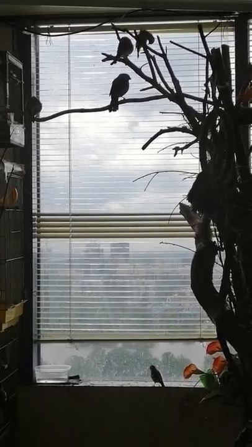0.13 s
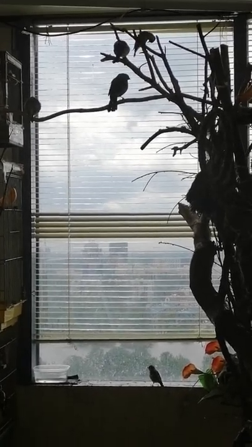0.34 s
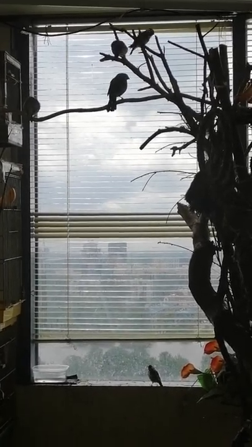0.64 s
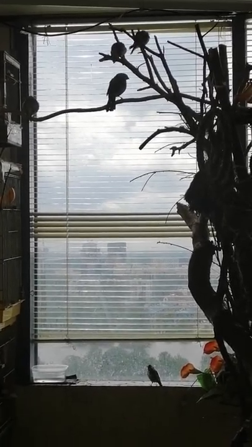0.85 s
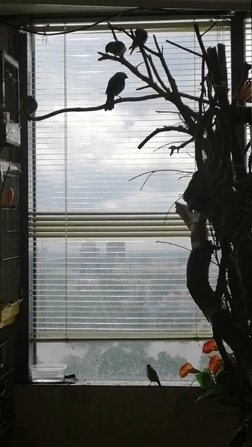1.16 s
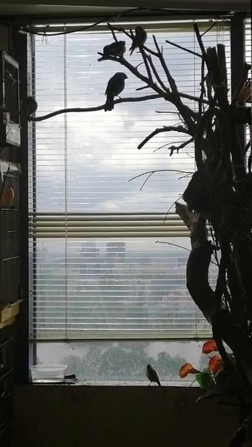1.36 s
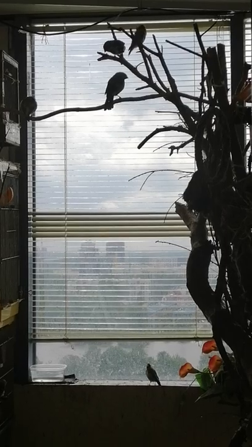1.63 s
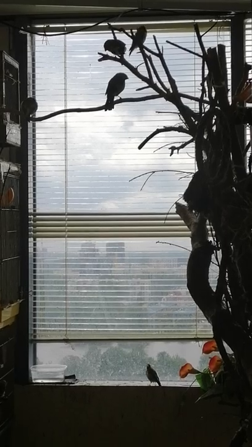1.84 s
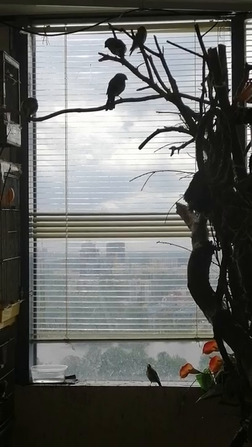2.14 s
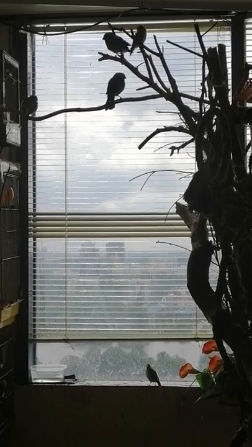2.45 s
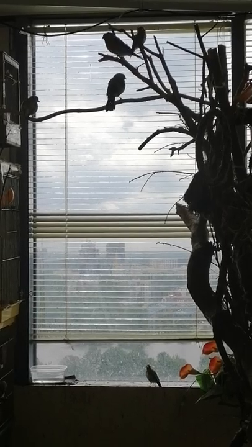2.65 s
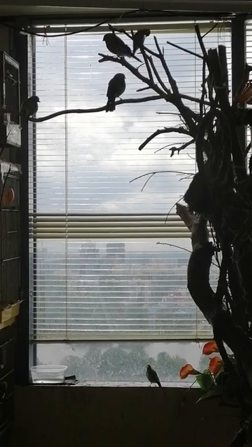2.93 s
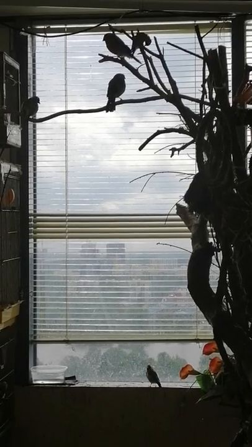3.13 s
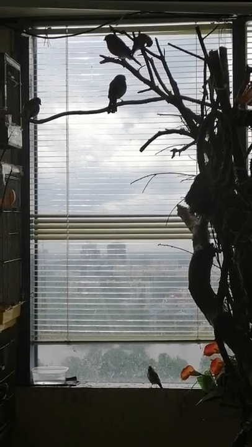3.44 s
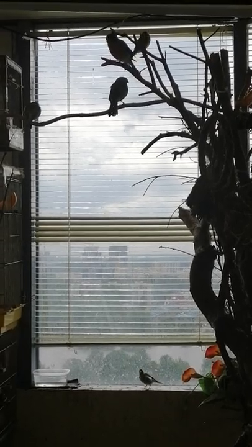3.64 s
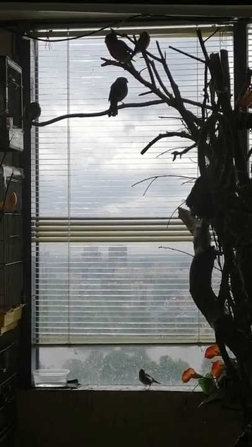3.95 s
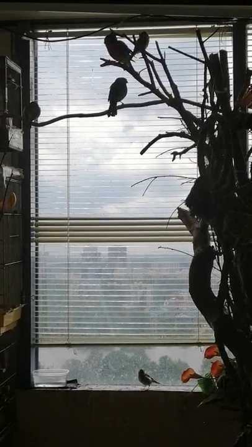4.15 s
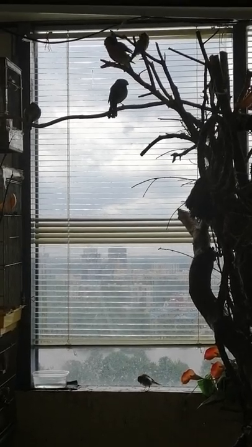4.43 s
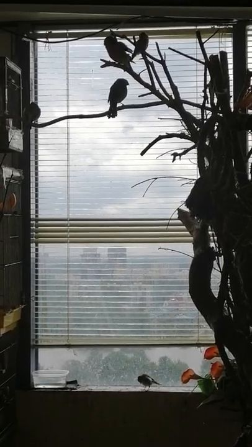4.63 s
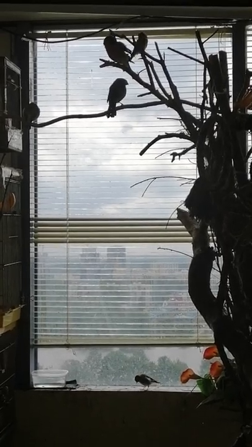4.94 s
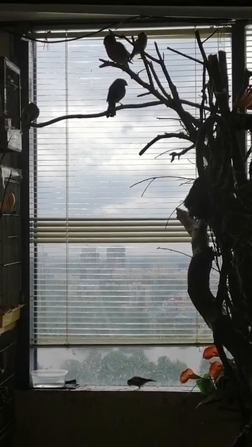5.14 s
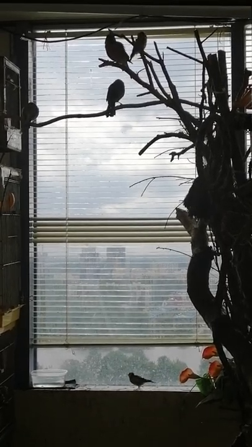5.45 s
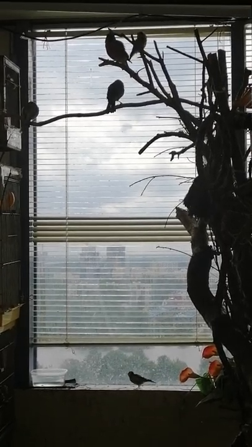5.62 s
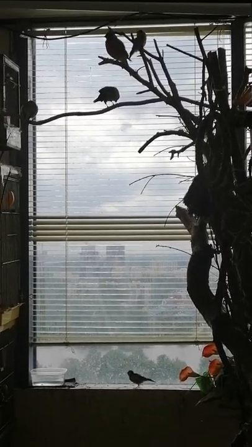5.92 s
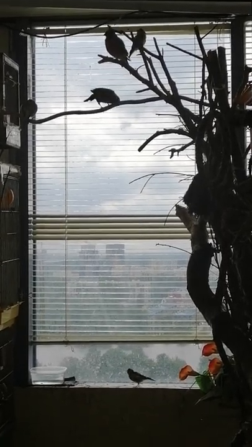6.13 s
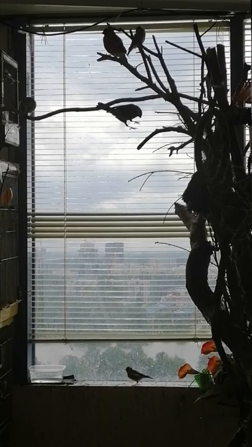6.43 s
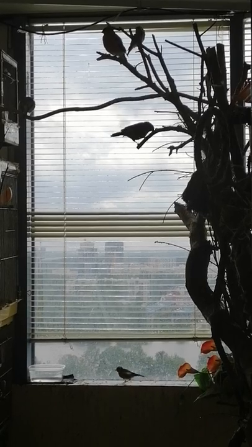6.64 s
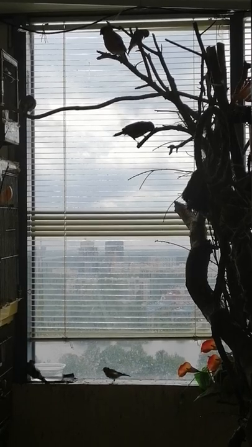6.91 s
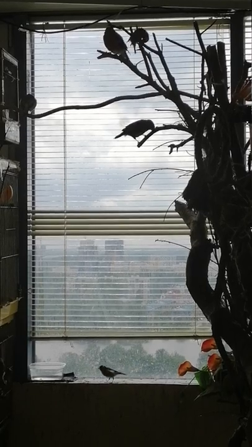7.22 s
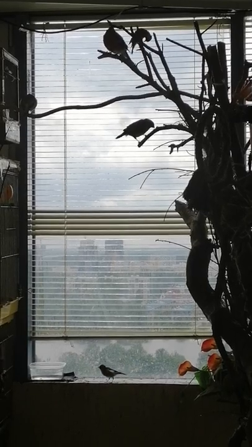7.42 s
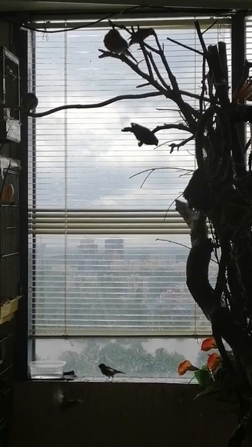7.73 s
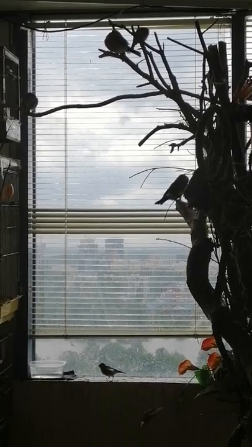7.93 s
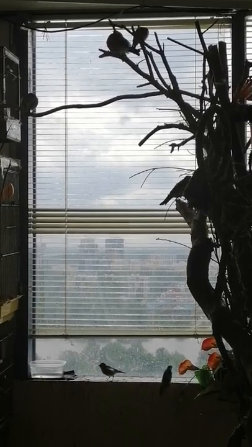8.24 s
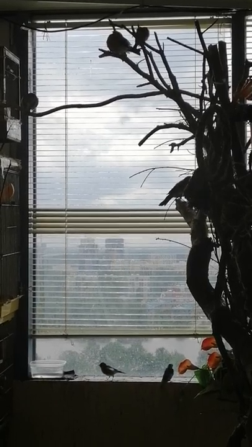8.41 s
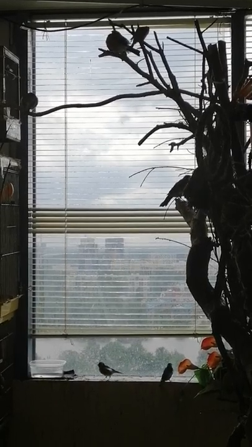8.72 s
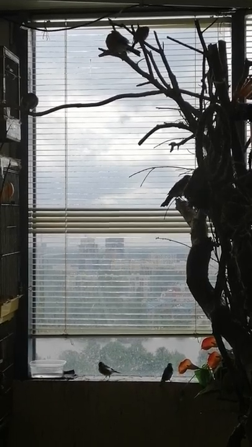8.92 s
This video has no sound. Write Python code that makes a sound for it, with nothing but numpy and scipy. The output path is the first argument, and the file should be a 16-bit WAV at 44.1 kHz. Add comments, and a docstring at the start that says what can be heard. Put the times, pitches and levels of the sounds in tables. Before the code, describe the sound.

Indoor bird twitter over a low, swelling city murmur. Harsh chattering calls come first, then a sparse stretch of faint chirps, clicks and a momentary total silence. Soft squawks thicken around the middle, with clear whistles that break downward, then three short chacks. Piercing high sweeps, a slow upslur and bright nasal calls end it. The microphone hears birds at some distance, with lively room echo and a duller right side.

```python
"""A bare, ringing room with a window: a city murmurs behind it, shaped noise whose level swells.
Several small songbirds sing: gliding sines make low whistles, upslurs, drops, high arches and chirps;
pulse trains through throat resonances make nasal calls, squawks and, with hiss, harsh chatter.
Noise snaps make ticks of bills and claws; decaying modes make one knock on a perch.
The sound cuts out once, for about a tenth of a second."""
import sys
import numpy as np
from scipy import signal
from scipy.fft import rfft, irfft, next_fast_len
from scipy.io import wavfile
from scipy.ndimage import map_coordinates

SR = 44100
rng = np.random.default_rng(int(sys.argv[2]) if len(sys.argv) > 2 else 0)


def materialize(psi):
    """Save the field psi as 16-bit PCM at rate SR to the path in sys.argv[1].

    A 1-D psi becomes a single channel; in a 2-D psi each row is a channel.
    """
    bounded = np.clip(np.atleast_2d(psi).T, -1, 1)
    quanta = np.round(bounded * 32767).astype(np.int16)
    wavfile.write(sys.argv[1], SR, quanta)


N = 399987
TOP_HZ = 15750  # band limit


def amp(db):
    """Decibels to amplitude."""
    return 10 ** (np.asarray(db) / 20)


def unit(x):
    """Each channel at rms 1."""
    return x / np.sqrt(np.mean(x ** 2, axis=-1, keepdims=True) + 1e-20)


def along(points, hz):
    """(Hz, value) points interpolated on a log frequency axis."""
    f, v = np.transpose(points)
    return np.interp(np.log(hz + 1), np.log(f + 1), v)


def wobble(rate_hz, size):
    """A smooth random curve, rate_hz knots a second."""
    knots = rng.standard_normal(int(size * rate_hz / SR) + 4)
    return map_coordinates(knots, [np.arange(size) * rate_hz / SR], order=2)


def filtered(x, response):
    """x times a response of frequency."""
    n = x.shape[-1]
    m = next_fast_len(n + 2048)
    return irfft(rfft(x, m) * response(np.fft.rfftfreq(m, 1 / SR)), m)[..., :n]


def add(track, s, sound):
    """Mix a stereo sound in at time s."""
    start = max(round(s * SR), 0)
    part = track[:, start:start + sound.shape[1]]
    part += sound[:, :part.shape[1]]


def panned(db, left_db):
    """Gains of left and right, left_db apart."""
    return amp([[db + left_db / 2], [db - left_db / 2]])


def swell(u, peak, power):
    """A smooth rise and fall over u = 0..1, highest at peak."""
    quarter_turns = np.interp(u, [0, np.clip(peak, .05, .95), 1], [0, np.pi / 2, np.pi])
    return np.abs(np.sin(quarter_turns)) ** power


# room decay: f/Hz, t60/s
ROOM_DECAY = [(2000, 0.36), (5500, 0.35), (8000, 0.35), (14000, 0.29)]


def room(direct_db, early_db=3, early_s=0.061, build_s=0.0013):
    """One path to both channels: direct sound, echoes that pile up, a tail that dies by band."""
    hz, t, z = signal.stft(rng.standard_normal((2, SR // 2)), SR, nperseg=256)
    decay_db = -60 * t / along(ROOM_DECAY, hz)[:, None]
    early_boost_db = early_db * np.exp(-t / early_s)
    build_up = 1 - np.exp(-t / build_s)
    path = signal.istft(z * amp(decay_db + early_boost_db) * build_up, SR, nperseg=256)[1]
    path /= np.linalg.norm(path, axis=1, keepdims=True)
    path[:, 0] += amp(direct_db)
    return path


def heard(sound, direct_db):
    """A sound through a newly drawn room path, at rms 1 over its length plus 40 ms of echo."""
    wet = signal.fftconvolve(sound[None], room(direct_db), axes=1)
    body = wet[:, :len(sound) + SR // 25]
    return wet / np.sqrt(np.mean(body ** 2, axis=1, keepdims=True) + 1e-20)


# murmur spectrum: f/Hz, relative level/dB per Hz
MURMUR_COLOUR = [(25, -2.5), (62, -8), (82, -15.5), (170, -5.5), (420, -16), (1050, -13), (1600, -22.5),
                 (2500, -27), (3300, -26), (4100, -44), (4900, -26.5), (6200, -35), (11000, -39)]
# murmur left-right likeness: f/Hz, correlation/0-1
MURMUR_ALIKE = [(150, 0.84), (600, 0.51), (1500, .05)]
# murmur swells, before drift: t/s, level/dB
MURMUR_SWELLS = [(0, -58), (2, -53.5), (3.199, -55.5), (5.4, -57), (5.75, -52), (6.1, -57.5), (7.3, -56),
                 (9, -57.5)]


def murmur(drift_db=1.5):
    """Distant city: shaped noise, nearly the same in both channels in the bass."""
    def mid_side(f):
        turn = np.arccos(np.clip(along(MURMUR_ALIKE, f), -1, 1)) / 2
        return amp(along(MURMUR_COLOUR, f)) * np.array([np.cos(turn), np.sin(turn)])

    mid, side = filtered(rng.standard_normal((2, N)), mid_side)
    db = np.interp(np.arange(N) / SR, *np.transpose(MURMUR_SWELLS)) + drift_db * wobble(14, N)
    return unit(np.array([mid + side, mid - side])) * amp(db)


# bill and claw contacts: t/s, level/dB
TICK_TIMES = [(1.318, -53.5), (1.345, -52), (1.995, -56.5), (2.032, -55.5), (2.512, -51), (2.672, -54.5),
              (4.581, -54), (6.345, -49), (6.512, -48), (7.029, -46.5), (7.093, -54.5), (7.755, -42.5)]
# tick spectrum: f/Hz, relative level/dB
TICK_SPECTRUM = [(1200, -57), (3000, -1.5), (6000, -2), (7800, 13), (10000, 3), (15000, -35)]


def ticks(t60_s=0.048):
    """Tiny hard contacts: 20 ms noise snaps, mostly heard as the room's answer."""
    out = np.zeros((2, N))
    t = np.arange(SR // 50) / SR
    for s, db in TICK_TIMES:
        snap = rng.standard_normal(len(t)) * amp(-60 * t / t60_s)
        coloured = filtered(snap, lambda f: amp(along(TICK_SPECTRUM, f)))
        add(out, s, amp(db) * heard(coloured, direct_db=-6.5))
    return out


KNOCK_S, KNOCK_DB = 3.554, -50.5
# perch modes: f/Hz, relative level/dB, t60/s
PERCH_MODES = [(850, -4.5, 0.033), (1600, -11.5, 0.023), (3200, -11, .01), (3750, 1, .008),
               (4250, 4, 0.0098), (8400, -1, 0.0079)]


def knock():
    """A bird knocks once on its perch: decaying modes make a short woody tap."""
    out = np.zeros((2, N))
    t = np.arange(SR // 40) / SR
    ring = sum(amp(db - 60 * t / t60) * np.sin(2 * np.pi * hz * t) for hz, db, t60 in PERCH_MODES)
    add(out, KNOCK_S, amp(KNOCK_DB) * heard(ring, direct_db=-8))
    return out


def glide(length_s, pitches_hz, waver, rate_hz):
    """Progress 0..1 and phase of a note that bends through its pitches and wavers on the way."""
    u = np.linspace(0, 1, int(length_s * SR))
    bend = np.polyfit(np.linspace(0, 1, len(pitches_hz)), pitches_hz, len(pitches_hz) - 1)
    hz = np.polyval(bend, u) * np.exp(waver * wobble(rate_hz, len(u)))
    return u, 2 * np.pi * np.cumsum(hz) / SR


def whistle(length_s, pitches_hz, direct_db, waver=0.007, waver_rate_hz=67.0, second_db=-38):
    """A relaxed syrinx holds a near sine, which builds up and beats in the room."""
    u, phase = glide(length_s, pitches_hz, waver, waver_rate_hz)
    tone = np.sin(phase) + amp(second_db) * np.sin(2 * phase)
    return heard(tone * swell(u, peak=0.45, power=1.0), direct_db)


def chirp(length_s, pitches_hz, harsh, flutter=0.145, overtone=0.55, overtone_top_hz=9500):
    """A sweep the room smears into a band; a pressed syrinx flutters and gains an overtone."""
    u, phase = glide(length_s, pitches_hz, flutter * harsh, rate_hz=1100)
    second = overtone * harsh / (1 + (2 * np.mean(pitches_hz) / overtone_top_hz) ** 6)
    tone = np.sin(phase) + second * np.sin(2 * phase)
    return heard(tone * swell(u, peak=0.41, power=0.35), direct_db=-15.5)


def pulses(phase, pitch_hz):
    """The syrinx snaps shut once a cycle: all harmonics alike."""
    return unit(sum(np.cos(k * phase) for k in range(1, int(TOP_HZ / pitch_hz) + 1)))


# throat and open bill of a call: f/Hz, relative level/dB
THROAT_COLOUR = [(1100, -14.5), (2000, -0.5), (3100, 5), (4000, -7), (5200, 0.5), (7200, 0.5),
                 (10500, -11.5), (14500, -14)]


def voiced(source, bill_hz, focus_db_per_octave):
    """Throat resonances, one band favoured by the open bill, then the room."""
    def colour(f):
        octaves_off = np.abs(np.log2((f + 1) / bill_hz))
        return amp(along(THROAT_COLOUR, f) - focus_db_per_octave * octaves_off)

    return heard(filtered(source, colour), direct_db=-10)


def rasp(length_s, pitch_hz, rough, softness, hiss=.45, rattle_db=5, crescendo_db=6):
    """Uneven pulses with rushing air; the air pressure builds towards mid-call, and rattles."""
    u, phase = glide(length_s, [pitch_hz] * 3, rough, rate_hz=600)
    source = pulses(phase, pitch_hz) + hiss * rough * rng.standard_normal(len(u))
    crescendo = crescendo_db * swell(u, peak=0.53, power=1.5)
    rattle = rattle_db * wobble(219, len(u))
    return source * amp(crescendo + rattle) * swell(u, 0.19, softness)


# rising chirps: t/s, length/s, middle f/Hz, level/dB, harshness/0-1
RISING_CHIRPS = [(1.703, 0.033, 2726, -43.5, 0.76), (2.349, 0.028, 3230, -46, 0.48),
                 (2.47, 0.027, 4390, -47.5, 0.2), (3.237, 0.037, 4870, -46, 0.7),
                 (6.108, 0.0057, 1900, -48, 0.2), (6.251, 0.0097, 1946, -44.5, 0.03),
                 (7.424, 0.043, 4800, -46, 0.87)]
# chirps that fall fast, then slowly: t/s, length/s, start f/Hz, fall/Hz, level/dB, harshness/0-1
FALLING_CHIRPS = [(0.244, 0.023, 7360, 853, -44, 0.6), (0.41, 0.057, 8180, 1410, -35, 0.3),
                  (1.101, 0.029, 2793, 713, -37, 0.29), (1.376, 0.075, 3115, 496, -47, 0.65),
                  (1.452, .031, 4730, 493, -42, 0.5), (2.112, 0.059, 7770, 780, -49.5, 0.4),
                  (5.132, .05, 3626, 790, -33.5, .33), (5.89, 0.035, 4280, 340, -45, 0.75),
                  (7.1, 0.025, 2497, 840, -34, 0), (7.499, 0.07, 3533, 780, -48, 0.72),
                  (8.644, .037, 6630, 1053, -45.5, 1), (8.799, 0.039, 3720, 1903, -34, 0.76)]
# buzzy notes creeping upwards: t/s, length/s, middle f/Hz, level/dB, harshness/0-1
BUZZY_NOTES = [(.456, 0.044, 3360, -36.5, .42), (3.035, .11, 2900, -58, .8), (3.035, .11, 6020, -52, .34),
               (5.052, 0.045, 5500, -43, 0.1), (5.216, .09, 3040, -34.5, 0.27),
               (5.687, 0.052, 5390, -39.5, .22), (5.924, .075, 3472, -35.5, 0.37),
               (5.92, .04, 2090, -48.5, 0.54), (8.734, 0.078, 2320, -45.5, 0.69)]
# short plain whistles: t/s, length/s, start f/Hz, end f/Hz, level/dB
PLAIN_PIPES = [(1.091, 0.012, 4800, 4930, -42), (2.083, 0.074, 4900, 4580, -57.5),
               (2.663, 0.093, 3870, 3480, -47), (2.773, 0.11, 4980, 4710, -57),
               (3.001, 0.059, 2170, 1900, -61), (3.248, 0.054, 5740, 6040, -42.5),
               (5.7, 0.087, 846, 924, -58.5), (5.69, 0.15, 1675, 1890, -61), (5.79, 0.094, 4900, 4750, -58),
               (7.058, 0.17, 4850, 4730, -57.5), (7.3, 0.21, 1160, 1205, -56),
               (8.026, .065, 5130, 5280, -42), (8.781, 0.026, 5210, 5360, -38)]
RISE_OCTAVES, CREEP_OCTAVES = 0.485, .12
EARLY_FALL = .62  # share of the fall done halfway through


def chirps():
    """Twitter between the louder calls: gliding sines, rising, falling, buzzy and plain."""
    out = np.zeros((2, N))
    for notes, octaves in (RISING_CHIRPS, RISE_OCTAVES), (BUZZY_NOTES, CREEP_OCTAVES):
        for s, length, hz, db, harsh in notes:
            ends_hz = hz * 2 ** (octaves * np.array([-.5, .5]))
            add(out, s, amp(db) * chirp(length, ends_hz, harsh))
    for s, length, hz, fall_hz, db, harsh in FALLING_CHIRPS:
        add(out, s, amp(db) * chirp(length, [hz, hz - EARLY_FALL * fall_hz, hz - fall_hz], harsh))
    for s, length, start_hz, end_hz, db in PLAIN_PIPES:
        note = whistle(length, [start_hz, end_hz], direct_db=-6.5, waver=0.017, waver_rate_hz=303)
        add(out, s, amp(db) * note)
    return out


# nasal calls: t/s, length/s, pitch f/Hz, waver/0-1, bill resonance f/Hz, level/dB
NASAL_CALLS = [(0, 0.012, 1846, 0.02, 4750, -40), (1.091, 0.015, 982, 0.02, 3940, -43.5),
               (5.673, 0.095, 876, 0.06, 5700, -52.5), (5.908, 0.032, 1705, 0.05, 6800, -38),
               (7.91, 0.1, 1725, .07, 5970, -41), (8.99, 0.064, 1060, 0.05, 6700, -34),
               (8.998, .075, 1702, 0.06, 5830, -31.5)]


def nasals():
    """Even pulses give a clear stack of harmonics."""
    out = np.zeros((2, N))
    for s, length, hz, waver, bill_hz, db in NASAL_CALLS:
        u, phase = glide(length, [hz, hz], waver, rate_hz=310)
        source = pulses(phase, hz) * swell(u, 0.17, 0.1)
        add(out, s, amp(db) * voiced(source, bill_hz, focus_db_per_octave=10.5))
    return out


# softer, higher squawks: t/s, length/s, bill resonance f/Hz, level/dB
SQUAWK_CALLS = [(1.43, 0.068, 2620, -40.5), (1.492, 0.11, 2740, -42.5), (1.722, 0.022, 3750, -42),
                (3.948, .06, 2900, -47), (4.038, 0.041, 4420, -38.5), (4.425, 0.09, 5320, -41),
                (4.614, 0.086, 4960, -49), (4.821, 0.046, 4350, -54), (4.955, 0.094, 4920, -40.5),
                (5.14, 0.16, 5430, -49), (5.438, 0.051, 4900, -37.5), (7.236, 0.11, 3000, -53.5),
                (7.581, 0.084, 4560, -38), (7.782, 0.086, 3100, -38.5), (7.89, .07, 3950, -44),
                (8.478, 0.088, 4220, -41)]
SQUAWK_HZ, SQUAWK_ROUGH = 967, .15


def squawks():
    """Rasps that swell in softly, each with its own opening of the bill."""
    out = np.zeros((2, N))
    for s, length, bill_hz, db in SQUAWK_CALLS:
        source = rasp(length, SQUAWK_HZ, SQUAWK_ROUGH, softness=0.2)
        add(out, s, amp(db) * voiced(source, bill_hz, focus_db_per_octave=12.0))
    return out


# thin high arches: t/s, top f/Hz, slide/s, level/dB
ARCH_NOTES = [(4.297, 8100, 0.033, -43), (7.522, 8160, 0.032, -31), (8.162, 8590, .048, -30.5)]
ARCH_FOOT_HZ, ARCH_UP_S, ARCH_END_HZ = 5050, 0.015, 6700
TAIL_GAP_S, TAIL_S, TAIL_HZ, TAIL_DB = 0.032, .02, [5240, 3610], -12  # TAIL_DB re arch


def arches(harsh=0.083):
    """Sweeps shoot up, slide down and, after a tiny gap, end in a faint lower tail."""
    out = np.zeros((2, N))
    for s, top_hz, slide, db in ARCH_NOTES:
        add(out, s, amp(db) * chirp(ARCH_UP_S, [ARCH_FOOT_HZ, top_hz], harsh))
        add(out, s + ARCH_UP_S, amp(db) * chirp(slide, [top_hz, ARCH_END_HZ], harsh))
        tail_s = s + ARCH_UP_S + slide + TAIL_GAP_S
        add(out, tail_s, amp(db + TAIL_DB) * chirp(TAIL_S, TAIL_HZ, harsh))
    return out


# slow rise, then flick: t/s, level/dB, flick level/dB, harshness/0-1
UPSLUR_NOTES = [(.745, -33.5, -35, 0.12), (8.471, -32, -27, 0.07)]
RISE_S, RISE_HZ, FLICK_S, FLICK_HZ = .087, [1837, 2106, 2260], 0.032, [2286, 2760, 3500]


def upslurs():
    """A slow rising sweep runs straight into a quick flick upwards."""
    out = np.zeros((2, N))
    for s, db, flick_db, harsh in UPSLUR_NOTES:
        add(out, s, amp(db) * chirp(RISE_S, RISE_HZ, harsh))
        add(out, s + RISE_S, amp(flick_db) * chirp(FLICK_S, FLICK_HZ, harsh))
    return out


# held note, then low: t/s, hold/s, f/Hz, level/dB, held left over right/dB, low level/dB
DROP_NOTES = [(4.593, 0.11, 2710, -34, 15, -36.5), (5.189, 0.081, 2533, -27, -4.5, -40.5)]
DROP_S, SINK_S = .02, 0.0774
DROP_TO, SINK_TO = .76, .68  # shares of the held pitch
DROP_DB = -0.5  # the break, re the low note


def drops(low_left_db=-3.5):
    """A loud held whistle breaks downwards; the lower note sinks away."""
    out = np.zeros((2, N))
    for s, hold, hz, db, left_db, low_db in DROP_NOTES:
        held = whistle(hold, [hz, hz], direct_db=-11)
        add(out, s, panned(db, left_db) * held)
        drop = chirp(DROP_S, [hz, hz * DROP_TO], harsh=.03)
        add(out, s + hold - DROP_S / 2, amp(low_db + DROP_DB) * drop)
        sinking = whistle(SINK_S, [hz * DROP_TO, hz * SINK_TO], direct_db=-2.5)
        add(out, s + hold, panned(low_db, low_left_db) * sinking)
    return out


# two whistles, a curve each: t/s, f/Hz, level/dB (peak of the dry sine)
LOW_WHISTLE_CURVES = [
    [(0.09, 1514, -51), (0.136, 1424, -38), (0.206, 1346, -47.5), (0.226, 1336, -46), (0.272, 1295, -46),
     (0.3, 1400, -67)],
    [(7.81, 1490, -46.5), (7.878, 1587, -30.5), (8.026, 1506, -41), (8.038, 1487, -59), (8.084, 1470, -45),
     (8.1, 1320, -37)],
]


def low_whistles(left_db=-3):
    """Long low sines that follow drawn pitch and level curves."""
    out = np.zeros((2, N))
    for curve in LOW_WHISTLE_CURVES:
        s, hz, db = np.transpose(curve)
        t = np.arange(s[0], s[-1], 1 / SR)
        phase = 2 * np.pi * np.cumsum(np.interp(t, s, hz)) / SR
        tone = amp(np.interp(t, s, db)) * np.sin(phase)
        tone = tone * signal.windows.tukey(len(t), .1)
        add(out, s[0], np.std(tone) * panned(0, left_db) * heard(tone, direct_db=-7.5))
    return out


# loud chatter in one voice: t/s, length/s, level/dB
CHATTER_CALLS = [(0.243, 0.055, -38), (0.347, 0.095, -30.5), (0.534, 0.081, -29), (0.698, .057, -30.5),
                 (0.826, 0.14, -31), (3.624, 0.046, -31.5), (3.847, 0.069, -30.5), (6.363, 0.054, -29.5)]
CHATTER_HZ, CHATTER_ROUGH, CHATTER_BILL_HZ = 564.6, .24, 5870
# the same voice clipped to an even series of chacks
CHACK_START_S, CHACK_EVERY_S, CHACK_S = 6.594, .1685, 0.02
CHACK_BILL_HZ, CHACK_DB = 6050, -34


def chatter(chack_count=3):
    """Loud rasps, and a series of short, brighter chacks."""
    out = np.zeros((2, N))
    for s, length, db in CHATTER_CALLS:
        source = rasp(length, CHATTER_HZ, CHATTER_ROUGH, softness=0.2)
        add(out, s, amp(db) * voiced(source, CHATTER_BILL_HZ, focus_db_per_octave=13))
    for k in range(chack_count):
        source = rasp(CHACK_S, CHATTER_HZ, CHATTER_ROUGH, softness=0.63)
        chack = voiced(source, CHACK_BILL_HZ, focus_db_per_octave=19.5)
        add(out, CHACK_START_S + k * CHACK_EVERY_S, amp(CHACK_DB) * chack)
    return out


# right channel, dull in the treble: f/Hz, level under left/dB
RIGHT_UNDER_LEFT = [(1000, -5), (3200, -1), (5000, 8.5), (6000, 15), (7500, 23), (11500, 12.5), (15000, -3)]


def scene():
    """Birds, the right channel duller, over the murmur."""
    contacts = ticks() + knock()
    calls = nasals() + squawks() + chatter()
    song = chirps() + arches() + upslurs() + drops() + low_whistles()
    left, right = contacts + calls + song
    dull_right = filtered(right, lambda f: amp(-along(RIGHT_UNDER_LEFT, f)))
    return murmur() + np.array([left, dull_right])


SILENCE_START_S, SILENCE_END_S = 3.379, 3.4985


def record(dry):
    """A short silence, and nothing above the band limit."""
    t = np.arange(N) / SR
    live = (t < SILENCE_START_S) | (t > SILENCE_END_S)
    return filtered(dry * live, lambda f: f < TOP_HZ)


dry = scene()
out = record(dry)
materialize(out)
```